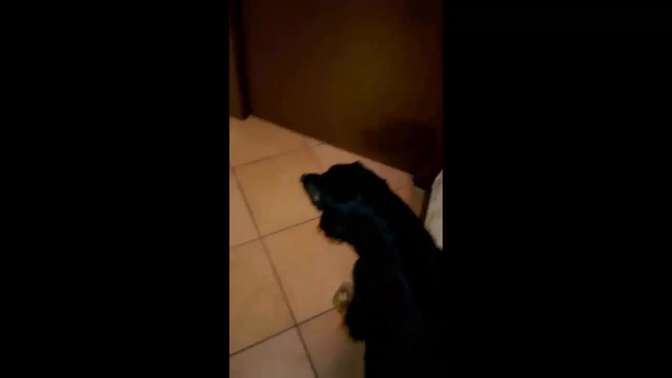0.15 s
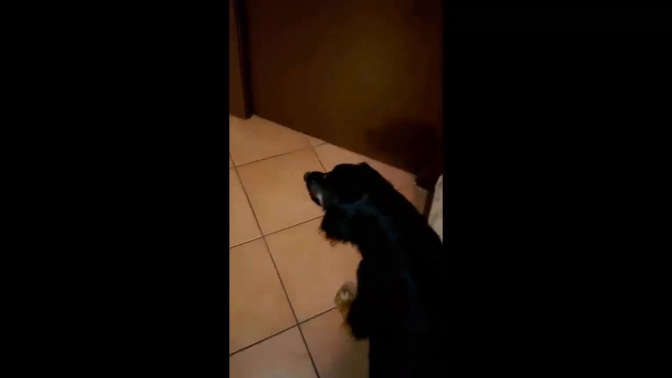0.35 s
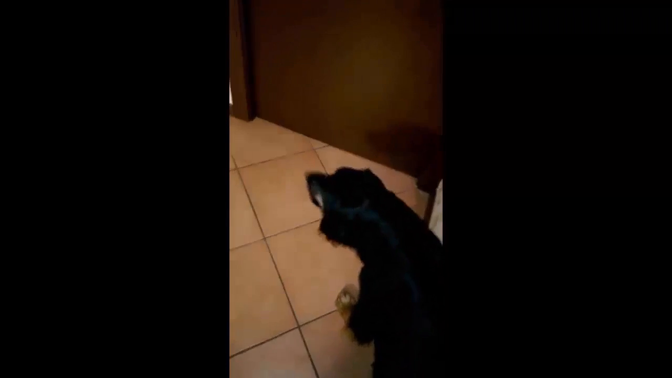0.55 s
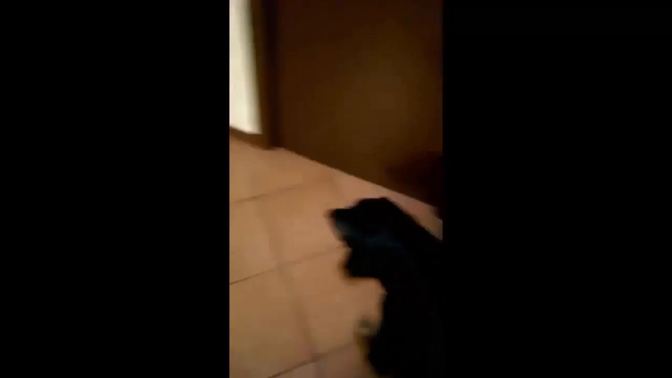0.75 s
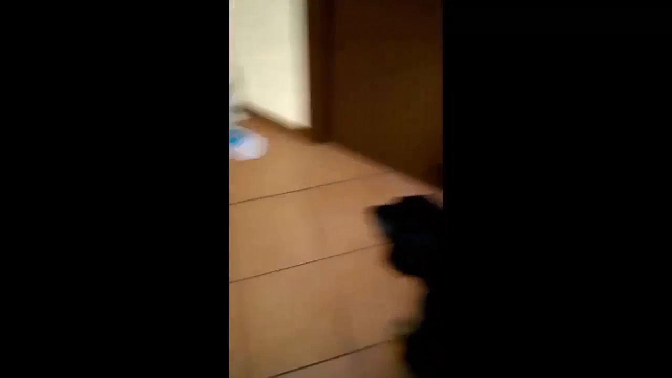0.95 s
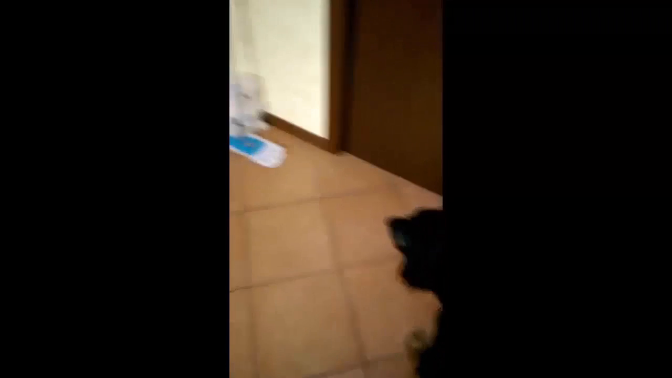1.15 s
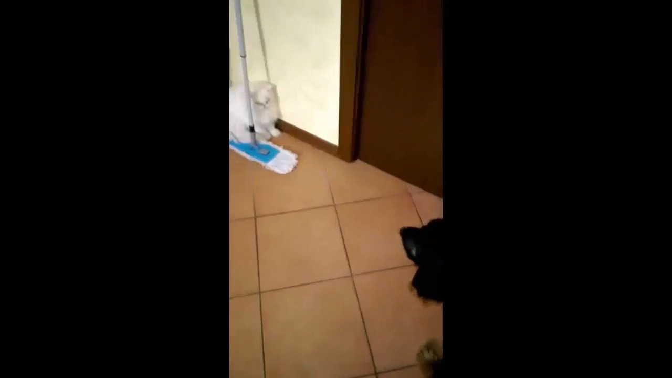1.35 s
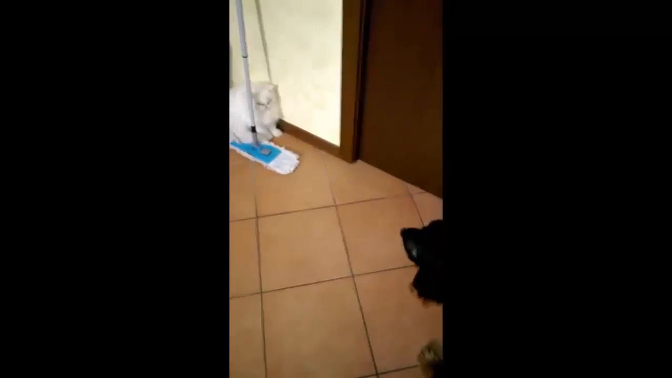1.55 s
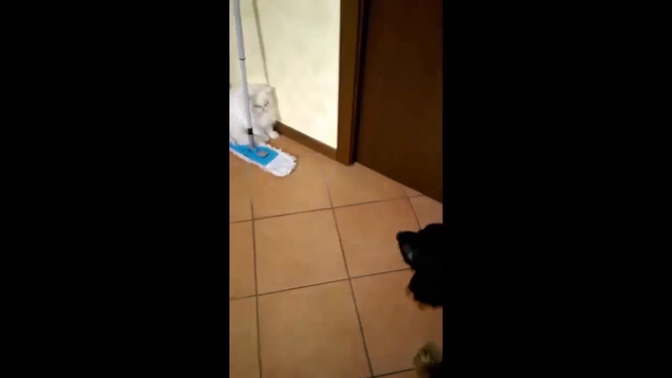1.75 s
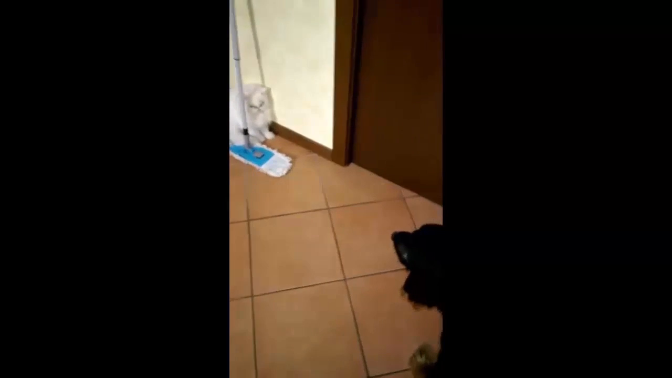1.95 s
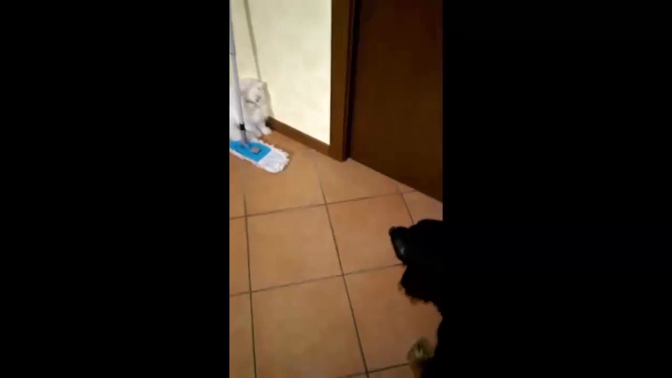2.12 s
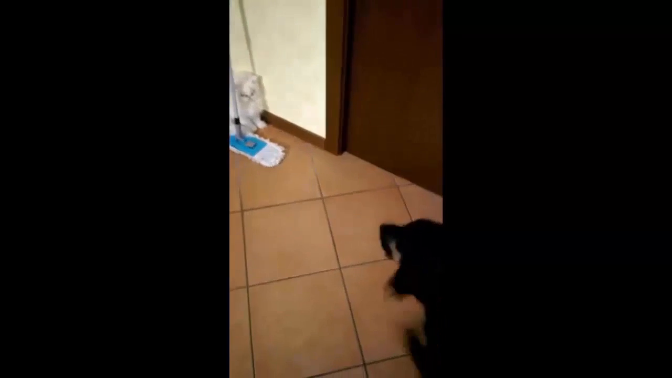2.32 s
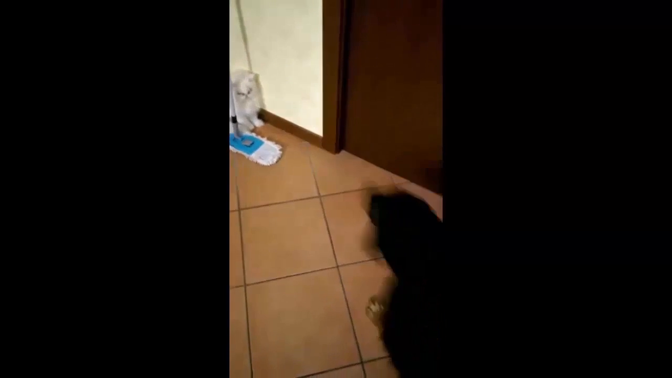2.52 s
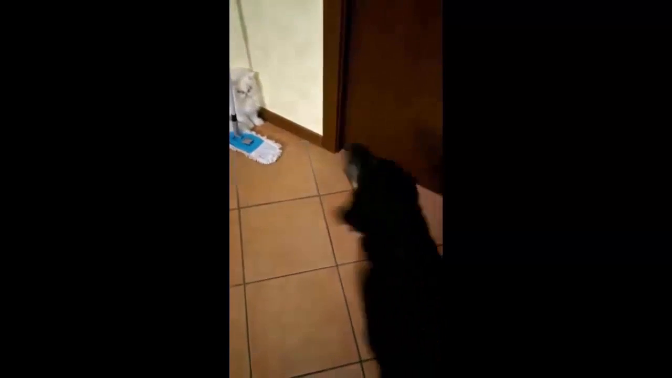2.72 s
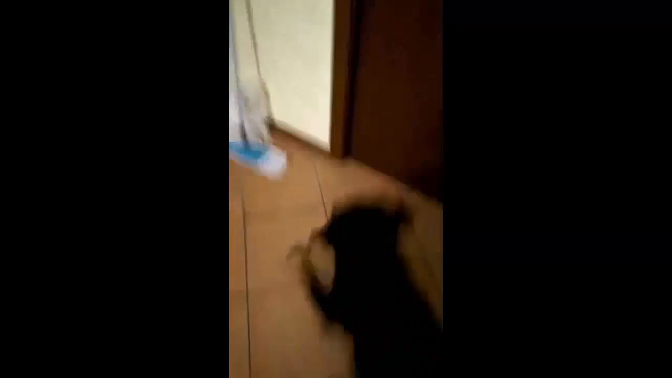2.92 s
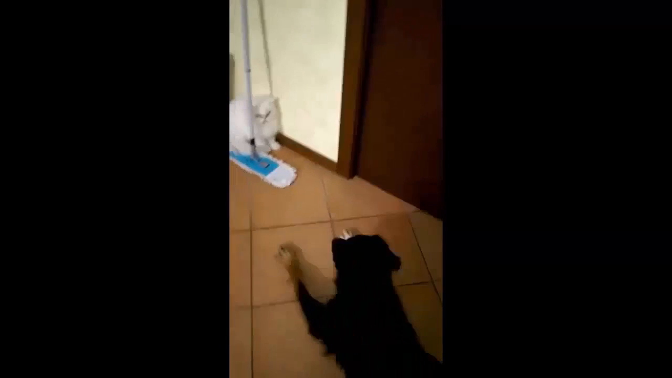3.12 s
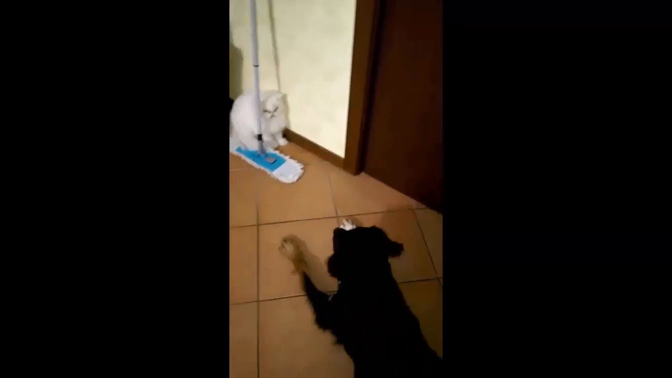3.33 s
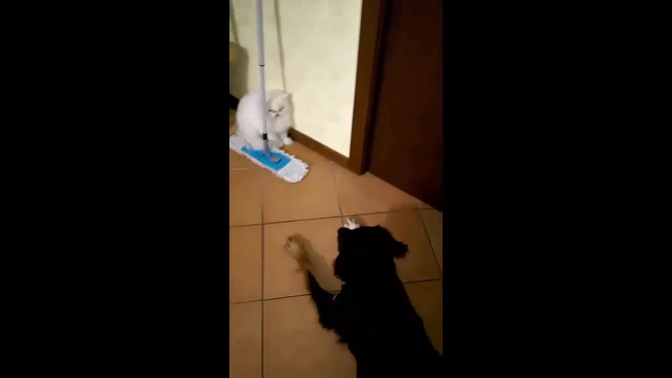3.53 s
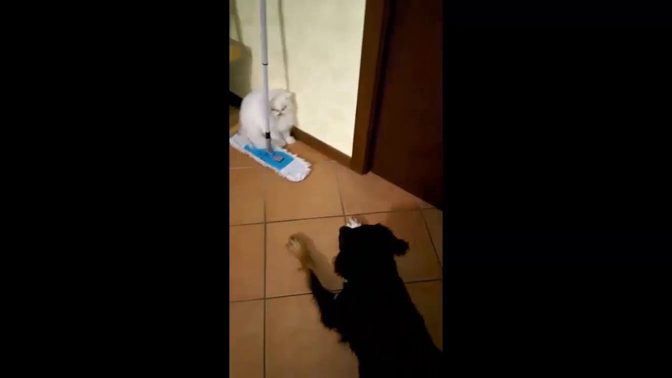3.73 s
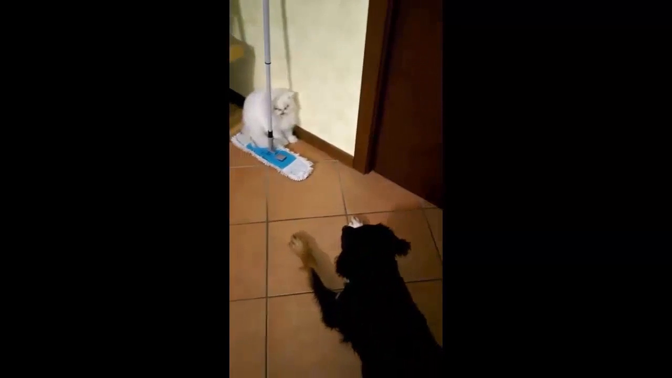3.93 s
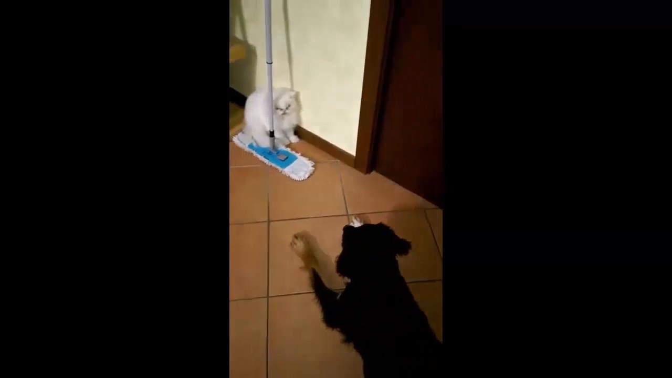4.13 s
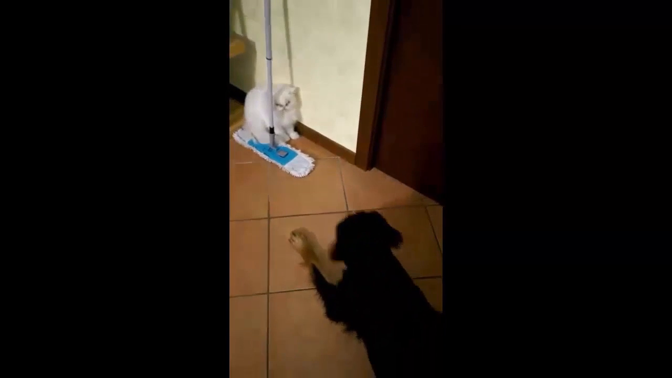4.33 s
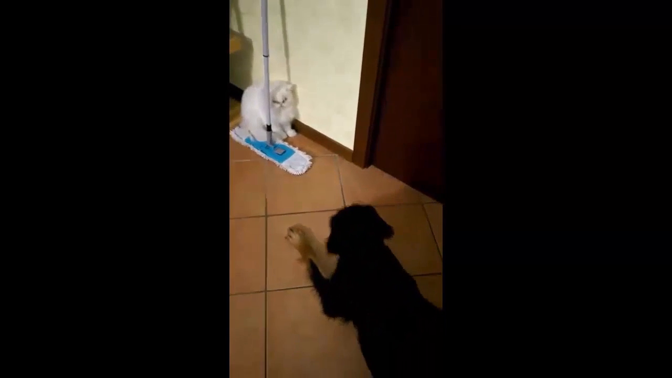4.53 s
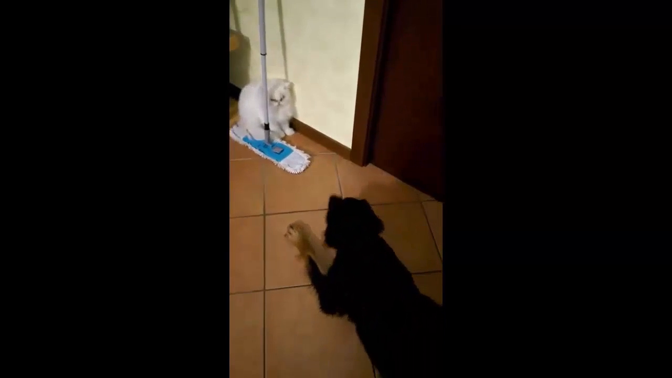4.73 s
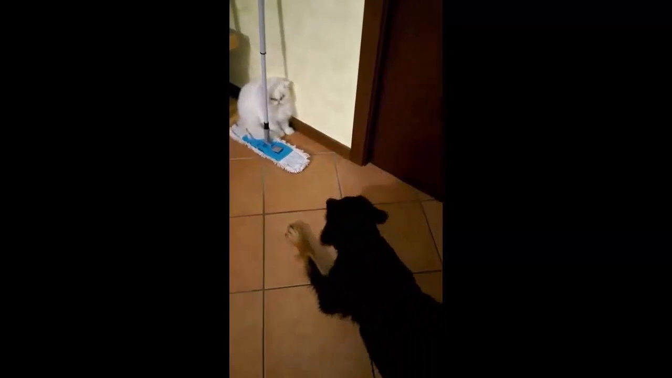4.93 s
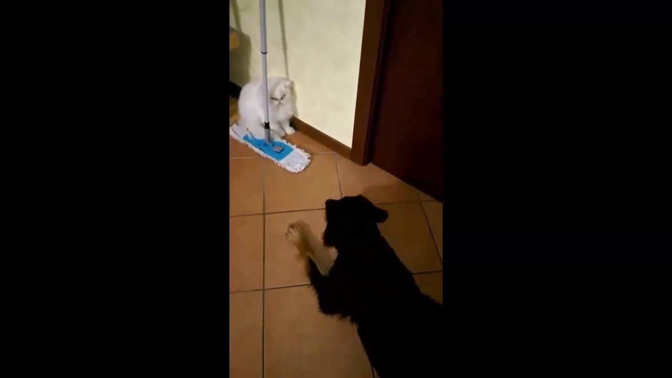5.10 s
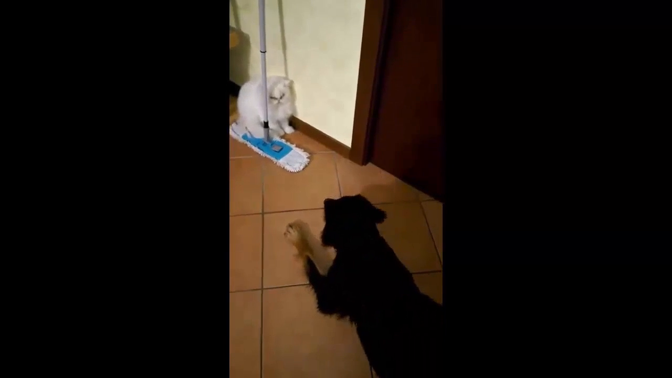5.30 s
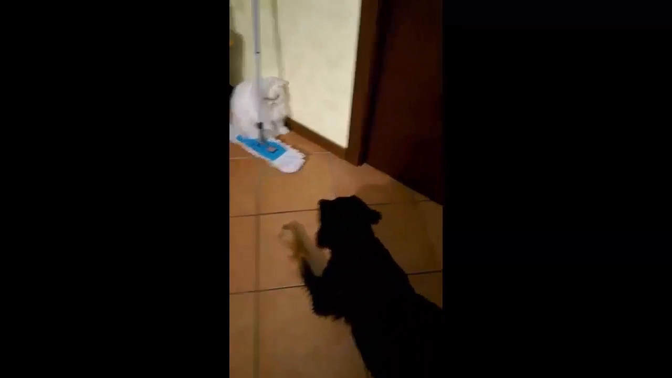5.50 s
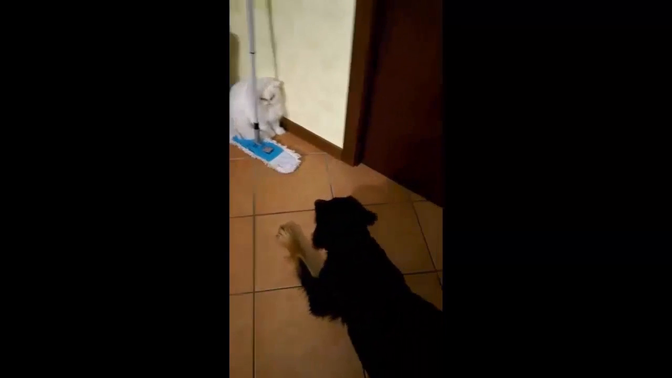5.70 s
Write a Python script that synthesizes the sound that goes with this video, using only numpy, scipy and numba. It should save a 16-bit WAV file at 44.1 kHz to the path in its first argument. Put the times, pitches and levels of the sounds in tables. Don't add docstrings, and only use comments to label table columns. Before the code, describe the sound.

One dog close to a phone in a narrow, hard-walled tiled hallway. A bark's echo fades, paws tap softly, a low muffled woof follows. After a quiet gap come three rapid, strong barks with chest grunts, then near silence, paw thuds, a deep short woof and a low growl over faint hiss.

```python
import sys
import numpy as np
from scipy import signal
from scipy.fft import rfft, irfft, next_fast_len
from scipy.io import wavfile
from scipy.ndimage import uniform_filter1d
from numba import njit

SR = 44100
rng = np.random.default_rng(int(sys.argv[2]) if len(sys.argv) > 2 else 0)


def store_wav(level_fs):
    pcm = np.round(np.clip(np.atleast_2d(level_fs), -1, 1) * 32767)
    wavfile.write(sys.argv[1], SR, pcm.T.astype(np.int16))


def attenuation_scalar(level_db):
    decades = np.asarray(level_db, float) / 20
    return 10 ** decades


N = 258426
LEAD = SR // 4


@njit
def moving_resonance(x, hz, width):
    y, band, low = np.empty(len(x)), 0., 0.
    for i in range(len(x)):
        g = np.tan(np.pi * hz[i] / SR)
        damping = width[i] / hz[i]
        v = (band + g * (x[i] - low)) / (1 + g * (g + damping))
        band = 2 * v - band
        low = low + 2 * g * v
        y[i] = damping * v
    return y


def steep(x, hz, width):
    hz, width = hz + 0. * x, width + 0. * x
    once = moving_resonance(x, hz, width)
    return moving_resonance(once, hz, width) * np.sqrt(SR / width / 1.9)


def colour(x, points, share=1):
    hz, db = np.transpose(points)
    size = next_fast_len(len(x))
    f = np.fft.rfftfreq(size, 1 / SR) + 1
    gain = attenuation_scalar(share * np.interp(np.log(f), np.log(hz), db))
    return irfft(rfft(x, size) * gain, size)[:len(x)]


def add(out, s, sound):
    i = int(s * SR) + LEAD
    out[i:i + len(sound)] += sound[:len(out) - i]


@njit
def folds(hz, rough, chance, jitter, shimmer):
    pulses, phase, p, cycle = np.zeros(len(hz) + 1), np.empty(len(hz)), 0., 0
    for i in range(len(hz)):
        step = hz[i] * (1 + jitter * rough[i] * chance[cycle, 0]) / SR
        p += step
        if p >= 1:
            p, cycle = p - 1, cycle + 1
            size = np.exp(shimmer * rough[i] * chance[cycle, 1]) / np.sqrt(step)
            pulses[i] += size * p / step
            pulses[i + 1] += size * (1 - p / step)
        phase[i] = p
    return pulses[:-1], phase


def voice(calls, throats, mouth_q, chest_db, chest_hz):
    nose_dip, nose_rise_s, nose_fall_s = 0.13, 0.02, 0.036
    out = np.zeros(N + LEAD)
    for call, resonances in zip(calls, throats):
        s, *columns = np.transpose(call)
        t = np.arange(s[0], s[-1], 1 / SR)
        hz, db, mouth_hz, open_db, rough = (np.interp(t, s, c) for c in columns)
        rough = np.clip(rough, 0, 1)
        chance = np.clip(rng.standard_normal((1000, 2)), -2, 2)
        pulses, phase = folds(hz, rough, chance, jitter=0.16, shimmer=0.74)
        breath = rng.standard_normal(SR)[:len(t)] * (0.35 + 3.31 * np.exp(-phase / 0.99))
        low = np.sqrt(1 - rough ** 2) * pulses + 0.81 * rough * breath
        high = np.sqrt(1 - rough) * pulses + np.sqrt(rough) * breath
        starting = np.exp(-np.maximum(t - s[1], 0) / nose_rise_s)
        ending = np.exp(np.minimum(t - s[-2], 0) / nose_fall_s)
        nose_bend = 1 - nose_dip * (starting + ending)
        throat = 0
        for k, (f, width, gain_db) in enumerate(resonances):
            source = low if f < 2200 else high
            centre = f * nose_bend ** (f > 4000)
            throat = throat + (-1) ** k * attenuation_scalar(gain_db) * steep(source, centre, width)
        mouth = steep(low, mouth_hz, mouth_hz / mouth_q)
        chest = attenuation_scalar(chest_db) * steep(low, chest_hz, 64.0)
        add(out, s[0], attenuation_scalar(db) * (mouth - chest + attenuation_scalar(open_db) * throat))
    return out


# after_snap_s, pitch_ratio, effort_db, muzzle_open_db, roughness [0-1]
YAP_START = [
    (-.04, 0.89, -38, -8, 0.38),
    (0, 0.88, -6, -2, 0.48),
    (0.031, 0.97, 0, -7.5, 0.22),
    (.065, .99, -.5, -14.5, 0.2),
    (.12, .94, -9.5, -11.5, .24),
]
# after_close_s, pitch_ratio, effort_db, muzzle_open_db, roughness [0-1]
YAP_END = [
    (0, .87, -5, -12, 0.21),
    (0.046, .82, -23, -18.5, 0.4),
]


def yap(snap_s, close_s, hz, db, sag):
    end_s = max(close_s, snap_s + YAP_START[-1][0] + 0.0058)
    call = []
    for at, stages in ((snap_s, YAP_START), (end_s, YAP_END)):
        for s, ratio, effort_db, open_db, rough in stages:
            mouth_hz = 450 * min(ratio, 1) ** (sag * 0.43)
            call.append((at + s, hz * ratio ** sag, db + effort_db, mouth_hz, open_db, rough))
    return call


# snap_open_s, close_s, pitch_hz, effort_db, share of the pitch sag
YAPS = [
    (-.17, -.05, 475.4, -32.5, 1.6),
    (2.272, 2.497, 475.8, -13, .75),
    (2.529, 2.726, 449.5, -13.5, .9),
    (2.811, 3.031, 446.7, -14, 1.034),
]
# centre_hz, width_hz, level_db
THROAT = [(637, 470, -1), (770, 690, 1.5), (1406, 390, 0.5), (1880, 440, -14.5), (2524, 260, -18),
          (3400, 1600, -42), (5390, 790, -14), (6830, 550, -19), (7900, 500, -31.5), (11100, 4800, -38)]


def barks():
    calls = [yap(*row) for row in YAPS]
    return voice(calls, [THROAT] * len(YAPS), mouth_q=1.42, chest_db=-41.5, chest_hz=200.)


# time_s, pitch_hz, effort_db, mouth_hz, muzzle_open_db
WOOFS = [
    [(.43, 121.9, -66, 390, -2), (.5, 123.8, -42, 450, -20.5), (.55, 128, -33, 433, -16.5),
     (.595, 129.9, -26, 340, -8.5), (.635, 126.6, -36.5, 320, -5.5), (.69, 111, -69, 325, 16)],
    [(4.67, 107.4, -36.5, 300, -19), (4.71, 118.1, -26.5, 299, -25.5), (4.755, 129.3, -17, 354, -9.5),
     (4.795, 132.6, -15.5, 365, -8), (4.83, 126.7, -24, 356, -16.5), (4.875, 116.5, -38, 315, -21)],
]
WOOF_ROUGH = [0.65, 0.22]
# centre_hz, width_hz, level_db
MUFFLED_THROAT = [(653, 95, 0.5), (1010, 390, -10.5), (1453, 210, -7.5), (2340, 640, -17.5),
                  (2900, 400, -21.5), (4000, 810, -24.5), (5700, 1900, -14.5), (10600, 2000, -31)]
# centre_hz, width_hz, level_db
WOOF_THROAT = [(600, 660, -2), (892, 210, -9), (1053.4, 210, -5), (1590, 950, -21), (1943, 200, -8),
               (2570, 160, -16), (2950, 410, -24), (5500, 1100, -14.5), (6350, 890, -17),
               (7150, 2300, -26.5), (10600, 5800, -36.5)]


def woofs():
    calls = []
    for curve, rough in zip(WOOFS, WOOF_ROUGH):
        top_db = max(row[2] for row in curve)
        calls.append([(*row, rough + 0.04 * (top_db - row[2])) for row in curve])
    return voice(calls, [MUFFLED_THROAT, WOOF_THROAT], mouth_q=1.56, chest_db=-35.0, chest_hz=200.)


# start_s, loudest_s, end_s, effort_db, roughness [0-1]
GRUNTS = [
    (0.407, 0.443, 0.6, -41, 0.3),
    (.46, 0.557, 0.83, -32.5, 0.5),
    (0.798, .86, 1.08, -52.5, 0.3),
    (2.206, 2.265, 2.3, -24.5, 0.3),
    (2.42, 2.493, 2.56, -22, 0.2),
    (2.666, 2.75, 2.82, -25.5, .3),
    (2.959, 2.977, 3.05, -36, 0),
    (4.65, 4.716, 4.8, -28.5, .3),
]


def grunts():
    pitch_hz, mouth_hz, open_db, edge_db, sag = 128, 137, -42, -24, .1
    calls = []
    for start_s, top_s, end_s, db, rough in GRUNTS:
        edge = (pitch_hz * (1 - sag), db + edge_db, mouth_hz, open_db, rough)
        top = (pitch_hz, db, mouth_hz, open_db, rough)
        calls.append([(start_s, *edge), (top_s, *top), (end_s, *edge)])
    return voice(calls, [THROAT[:2]] * len(GRUNTS), mouth_q=1.3, chest_db=-33.5, chest_hz=200.)


# time_s, pitch_hz, effort_db
GROWLS = [
    [(3.6, 52.4, -90), (3.66, 53.46, -68.5), (3.82, 51, -78.5), (3.88, 52, -88)],
    [(5.3, 51.2, -92), (5.335, 54.36, -58.5), (5.4, 61.64, -56.5), (5.56, 65, -60), (5.62, 69.05, -60.5),
     (5.69, 66.18, -64.5), (5.86, 65.9, -56.5)],
]
GROWL_ROUGH = [0.48, 0.059]
GROWL_MOUTH_HZ = [196, 271]
GROWL_OPEN_DB = [-4.5, -38]


def growls():
    settings = zip(GROWLS, GROWL_MOUTH_HZ, GROWL_OPEN_DB, GROWL_ROUGH)
    calls = [[(*row, mouth_hz, open_db, rough) for row in curve] for curve, mouth_hz, open_db, rough in settings]
    return voice(calls, [THROAT[:2]] * len(GROWLS), mouth_q=2.33, chest_db=-1.0, chest_hz=128.)


# time_s, peak_db, pad_hz, claw_db under the pad
PAWS = [
    (0.067, -33, 238.5, -32),
    (0.869, -35, 190, -53),
    (1.261, -45, 171, -56),
    (1.282, -38.5, 238, -47),
    (1.783, -47, 120, -27.5),
    (3.928, -22, 147, -90),
    (3.944, -32.5, 137.3, -21),
    (4.566, -12, 156.9, -26),
    (4.582, -22.5, 162.4, -26),
    (5.769, -34, 166, -67.5),
]


def paws():
    out, t = np.zeros(N + LEAD), np.arange(SR // 10) / SR

    def rise(peak_s):
        return t / peak_s * np.exp(1 - t / peak_s)

    for s, db, hz, claw_db in PAWS:
        fur, tick = rng.standard_normal((2, len(t)))
        pad = np.sin(2 * np.pi * hz * t) * rise(0.0034)
        dull = attenuation_scalar(-8.5) * steep(fur, 230.0, 280.0)
        scrape = attenuation_scalar(claw_db + 9.5) * steep(fur, 550.0, 620.0)
        scuff = rise(0.0033) * (dull + scrape)
        claw = rise(0.0054) * steep(tick, 4100.0, 5100.0)
        add(out, s, attenuation_scalar(db - 2) * (pad + scuff + attenuation_scalar(claw_db - 6) * claw))
    return out


# centre_s, half_length_s, level_db, centre_hz, width_hz
PUFFS = [(-.04, 0.039, -47.5, 2520, 300), (0.111, .2, -53.5, 90, 150), (0.495, .015, -28, 230, 117),
         (0.551, 0.035, -39.5, 2580, 149.6), (.54, .06, -46, 2900, 149.6), (0.641, .02, -40.5, 3054, 250),
         (1.351, 0.11, -57, 60, 89.8), (2.599, 0.067, -36, 213, 59.57), (4.448, 0.0084, -54, 2980, 2000),
         (1.302, 0.17, -78, 4450, 5000), (3.139, 0.0091, -45, 10440, 6000), (3.148, 0.074, -37, 870, 1150),
         (3.169, 0.13, -47, 5500, 4970), (3.458, 0.086, -56, 706, 1250), (3.77, 0.2, -72, 4900, 703),
         (3.758, 0.29, -75, 6830, 700), (4.436, 0.033, -64, 279, 200), (4.448, 0.024, -47, 6000, 3500),
         (4.534, .04, -55, 500, 892), (4.539, 0.024, -55.5, 5000, 4000), (4.664, 0.012, -49.5, 5960, 2910)]


def puffs():
    out = np.zeros(N + LEAD)
    for s, half, db, hz, width in PUFFS:
        t = np.arange(-half, half, 1 / SR)
        swell = np.cos(np.pi * t / half / 2) ** 2
        air = steep(rng.standard_normal(SR)[:len(t)], hz, width)
        add(out, s - half, attenuation_scalar(db) * swell * air)
    return out


# pitch_hz, left_db, right_db, time to fade by 60 dB [s]
HALL = [(65, -7.5, -10, 0.81), (89.3, -3.5, -4.5, 0.81), (135.5, 0, 3, 0.29), (160.8, 1, 0.5, 0.41),
        (195.7, -1, -2.5, 0.65), (230.7, -1, -1.5, 0.51), (259, -6, -2, 0.34), (300, -14.5, -2.5, 0.12),
        (327.3, -1, -1.5, 0.51), (369, -8.5, -8.5, .55), (381.5, 3.5, 2.5, 0.25), (48, -4.5, -4.5, 0.9),
        (450, 0, 0.5, 0.45), (480, -8, -4.5, 0.17)]


def hall():
    t = np.arange(int(.9 * SR)) / SR

    def fade(t60_s):
        return np.exp(-np.log(1000) * t / t60_s)

    def unit(x):
        return x / np.sqrt(np.mean(np.sum(x ** 2, axis=1)))

    def filtered(x, order, hz, kind="low"):
        return signal.sosfilt(signal.butter(order, hz, kind, fs=SR, output="sos"), x)

    modes = 0
    for (hz, left_db, right_db, t60_s), (start, apart) in zip(HALL, rng.uniform(-0.65, 1, (len(HALL), 2))):
        turn = np.pi * (start + np.array([[1], [-1]]) * apart * (hz / 700) ** 7.5)
        level = attenuation_scalar(np.array([[left_db], [right_db]]))
        modes = modes + level * np.sin(2 * np.pi * hz * t + turn) * fade(t60_s)
    mid, side = rng.standard_normal((2, len(t)))
    side = filtered(side, 1, 500, "high")
    noise = filtered(np.array([mid + 0.64 * side, mid - 1.1 * side]), 2, 330, "high")
    dull = filtered(noise, 1, 3000)
    noise = noise * np.exp(-t / 0.0048) + filtered(noise, 1, 7000)
    tail = attenuation_scalar(-8) * unit(dull * fade(0.67) + (noise - dull) * fade(0.25))
    early = attenuation_scalar(-4.5) * unit(noise * fade(0.095))
    build_up = 1 - np.exp(-t / 0.0014)
    out = build_up * (attenuation_scalar(-58) * modes + tail + early)
    out[[0, 1], [0, 5]] += attenuation_scalar(-5)
    return out


# pitch_hz, level_db per Hz
HISS = [(18, -35.5), (30, -3.5), (53, -11.5), (110, 3), (154, -3.5), (660, -11), (713, -11.5), (791, -21.5),
        (901, -13), (5270, -15.5), (11800, -28), (14900, -54.5)]
# pitch_hz, left_db, right_db
HUM = [(102.3, -100, -75), (726.7, -88, -88), (909.8, -96, -96)]


def background():
    hiss = np.array([colour(noise, HISS) for noise in rng.standard_normal((2, N))])
    t = np.arange(N) / SR
    hum = 0
    for hz, left_db, right_db in HUM:
        level = np.sqrt(2) * attenuation_scalar(np.array([[left_db], [right_db]]))
        hum = hum + level * np.sin(2 * np.pi * hz * t)
    return hiss * attenuation_scalar(-68) / np.std(hiss) + hum


# pitch_hz, level_db
MICROPHONE = [(20, 10), (60, 0), (7800, -1), (8800, -11.5), (15000, 0)]
# pitch_hz, left minus right in level_db
EARS = [(200, 1), (1000, 1.5), (2500, 5.5), (5000, 6), (9000, -10.5)]


def scene():
    calls = barks() + woofs() + grunts() + growls()
    dog = colour(calls + paws() + puffs(), MICROPHONE)
    left, right = signal.fftconvolve(dog[None], hall(), axes=1)[:, LEAD:LEAD + N]
    heard = np.array([colour(left, EARS, share=.5), colour(right, EARS, share=-.5)])
    return heard + background()


def band_limit(x):
    return signal.sosfilt(signal.butter(12, 15030, fs=SR, output="sos"), x)


def record(dry):
    ceiling_db, window_s = -8, 0.0051
    power = uniform_filter1d(np.mean(dry ** 2, axis=0), int(window_s * SR))
    loudness = np.sqrt(2 * power.clip(0))
    mix = dry / np.sqrt(1 + (loudness / attenuation_scalar(ceiling_db)) ** 2)
    return band_limit(mix)


dry = scene()
out = record(dry)
store_wav(out)
```